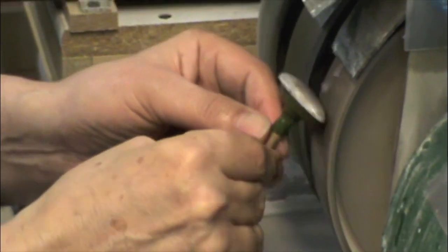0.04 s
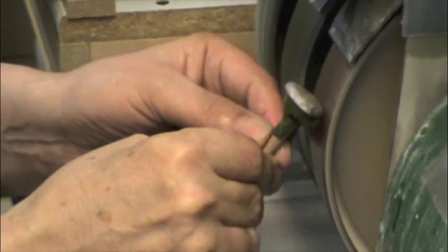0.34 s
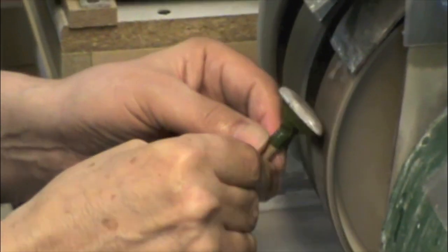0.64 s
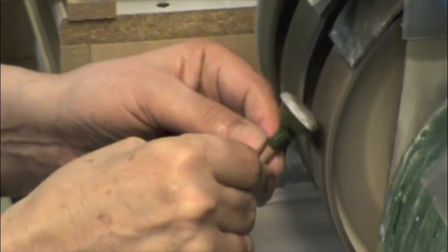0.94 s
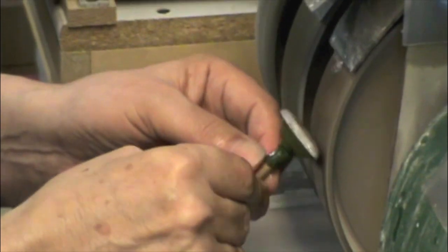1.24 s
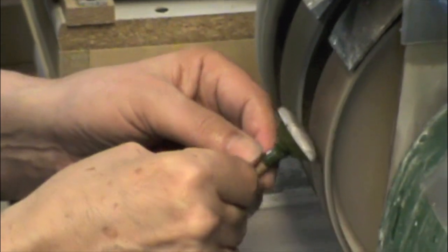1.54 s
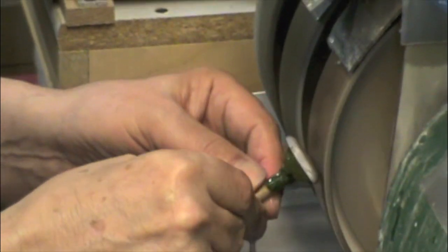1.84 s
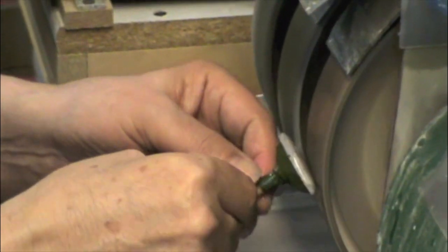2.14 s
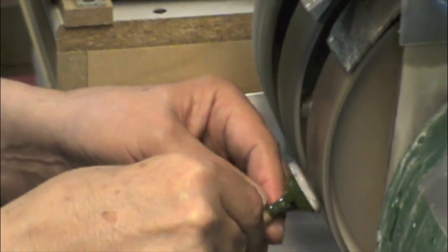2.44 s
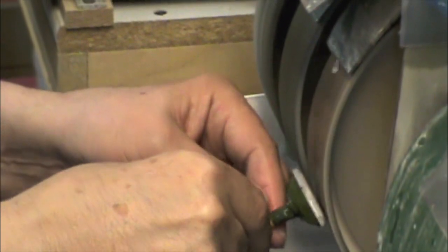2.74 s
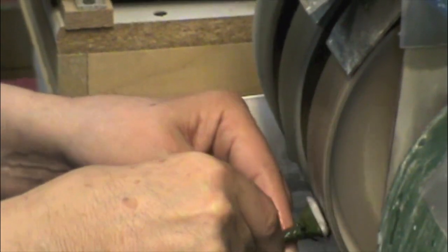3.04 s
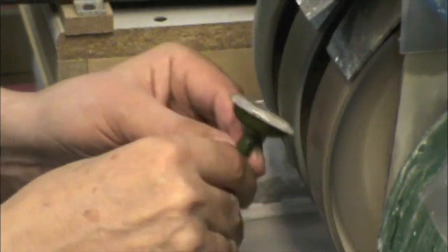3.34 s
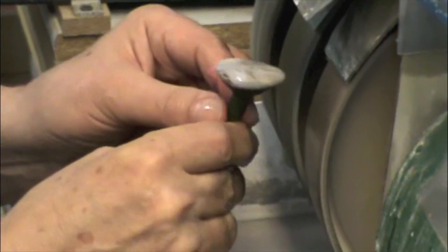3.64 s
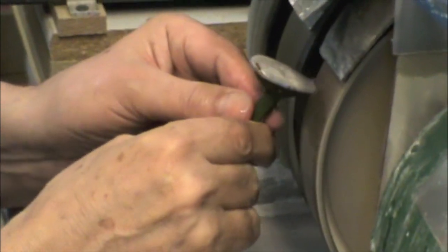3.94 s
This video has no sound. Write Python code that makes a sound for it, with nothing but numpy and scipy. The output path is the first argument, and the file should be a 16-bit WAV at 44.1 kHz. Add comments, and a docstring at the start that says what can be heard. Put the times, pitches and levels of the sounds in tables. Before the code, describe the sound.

Harsh, squealing grinding of a stone against a wheel, lifted off as the machine hums on.

```python
"""Grinding a stone on a wet wheel

A stone fixed to a slim holder is rocked against a grinding wheel and lifted off near the end.
Grit scrapes the stone and makes the holder ring in high tones that swell with each press and die
away after the lift. Underneath, the grinder hums and rumbles, its bearing chirps on every turn
and the wet wheel hisses faintly."""
import sys
import numpy as np
from scipy import signal
from scipy.fft import rfft, irfft
from scipy.io import wavfile
from scipy.ndimage import uniform_filter1d, map_coordinates

SR = 44100
rng = np.random.default_rng(int(sys.argv[2]) if len(sys.argv) > 2 else 0)


def to_wav(s):
    """Save 16-bit WAV."""
    ch = np.atleast_2d(s).T  # columns
    pcm = np.round(np.clip(ch, -1, 1) * 32767)  # PCM
    wavfile.write(sys.argv[1], SR, pcm.astype(np.int16))


N = 176400
TIME_S = np.arange(N) / SR
TURN_HZ = 29.11  # turns of the wheel each second
LIFT_S, LIFT_DB_PER_S = 3.336, 200
STEP = 32  # samples between updates of a ring's loudness

# The holder's modes, the tones it rings at: pitch_hz, offset_db, decay_s (to fall 60 dB), curve_name
HOLDER_MODES = [ (2935,-1.5,.07,"low"),(3095,-20,.03,"press"),(4404,-24,.1,"press"),(4520,-24,.1,"press"),(5135,0,2,"long"),(5346,-27,.4,"press"),
                (5825,-27,.2,"press"),(5997,-28,.2,"press"),(7111,-.5,.33,"pair"),(7381,-8,.35,"pair"),(8122,-18,.4,"press"),(8639,-14,.2,"press"),
                (8701,-10,.2,"press"),(8897,-2,.25,"press"),(9228,-9,.2,"press"),(10492,-19,.3,"press"),(10637,-9,.35,"press"),(10842,-20,.3,"press"),
                (11027,-13,.35,"press"),(11434,-6,.4,"high"),(11580,-4,.25,"high"),(12409,-16,.4,"press"),(12518,-5,.4,"high"),(12726,-11,.3,"press"),
                (12855,-18,.35,"press"),(13270,-7,.2,"high"),(13535,-18,.3,"press"),(14018,-23,.35,"press"),(14250,-13,.4,"high"),(15278,-17,.25,"high")]


def holder():
    """Friction makes the holder ring; it squeals when the stone catches and drives one mode."""
    # Pressure on the wheel, as how hard it drives the modes: time_s, level_db
    pressure = [(0.0, -28), (0.11, -32.5), (0.26, -19.5), (0.42, -26), (0.45, -38), (0.49, -26.5),
                (0.53, -32), (0.55, -22), (0.6, -32), (0.68, -31), (0.73, -36.5), (0.8, -27), (0.83, -29),
                (0.87, -22.5), (0.95, -24.5), (0.98, -19.5), (1.03, -20.5), (1.11, -39), (1.19, -25),
                (1.35, -40), (1.38, -31), (1.64, -25.5), (1.74, -34), (1.87, -26.5), (2.04, -42),
                (2.06, -25), (2.15, -21), (2.23, -30), (2.51, -45), (2.58, -27), (2.71, -22), (2.77, -33.5),
                (2.9, -36.5), (2.97, -27), (3.09, -33), (3.13, -21.5), (3.22, -23), (3.38, -50)]
    # Four curves for rings that come and go with the point of contact: time_s, level_db
    low_ring = [(0,-41.5),(2,-40.5),(2.1,-38),(2.22,-35),(2.5,-45.5),(2.68,-37),(2.95,-40),(3.12,-28),(3.18,-37),(3.3,-60)]
    long_ring = [(0,-46),(.8,-46.5),(1.1,-43),(2.03,-46),(2.15,-35.5),(2.5,-41),(2.7,-40.5),(3.1,-51),(3.2,-41.5),(3.52,-42.5),(4,-64)]
    pair_ring = [(0,-29),(.12,-44),(.2,-38),(.28,-32.5),(.34,-21),(.45,-39.5),(.58,-36),(.75,-47),(.79,-31),(.85,-40),
                 (.91,-27),(.96,-48),(.99,-30),(1.1,-30.5),(1.16,-37),(1.37,-48),(1.43,-32.5),(1.49,-43),
                 (1.63,-27.5),(1.73,-34),(1.85,-33),(2.02,-44),(2.18,-27.5),(2.44,-47),(2.6,-35.5),(2.7,-24.5),(2.91,-41),
                 (3.02,-31.5),(3.11,-41),(3.2,-29),(3.3,-40.5),(3.6,-53)]
    high_ring = [(0.0, -35), (0.14, -41), (0.3, -29), (0.52, -33), (0.95, -38), (1.1, -47), (1.58, -32.5),
                 (1.64, -46), (1.97, -39), (2.1, -29), (2.37, -38), (2.57, -49), (2.7, -31), (2.87, -45),
                 (3.18, -33), (3.3, -37.5)]
    # Brief squeals, each given to the nearest mode: middle_s, half_length_s, pitch_hz, level_db
    squeals = [(0.303,.05,10637,-21.5),(.32,0.055,5997,-35.5),(0.318,.05,11027,-25),(.35,0.051,5346,-37),(0.364,0.087,4404,-34),
               (.48,0.053,11580,-30),(.53,0.085,3095,-38),(0.573,.05,7381,-30),(0.844,.05,3095,-37),(.86,.04,5997,-39),
               (0.925,0.15,4404,-40),(0.99,.1,5346,-38),(1.5,0.07,3095,-34),(1.54,0.09,11600,-31),(1.597,0.093,5346,-38),
               (2.7,0.045,5346,-33),(2.692,0.054,11027,-25),(3.162,0.06,5997,-36),(3.192,.05,10637,-20)]
    lift = lift_db()
    curves = {"press": curve(pressure) + lift, "low": curve(low_ring) + lift,
              "high": curve(high_ring) + lift, "long": curve(long_ring), "pair": curve(pair_ring)}
    contact = undb(lift[::STEP])
    pitches = np.array([mode[0] for mode in HOLDER_MODES])
    boost_db, flicker_db = 1, 2.44
    out = 0
    for hz, offset_db, decay_s, curve_name in HOLDER_MODES:
        push = undb(offset_db + boost_db + curves[curve_name][::STEP])
        for middle_s, half_s, squeal_hz, squeal_db in squeals:
            if pitches[np.argmin(np.abs(pitches - squeal_hz))] == hz:
                push = np.maximum(push, undb(squeal_db) * swell(middle_s, half_s)[::STEP])
        flicker = flicker_db * wander(rate_hz=23.97)[::STEP] * contact
        out = out + ringing_mode(hz, decay_s, 20 * np.log10(push) + flicker)
    return out


def ringing_mode(hz, decay_s, drive_db):
    """One rubbed mode: it swells with its drive and fades no faster than its own decay."""
    friction = resonate(rng.standard_normal(N), hz, width_hz=118)
    ring = resonate(friction, hz, width_hz=.5 * np.log(1000) / np.pi / decay_s)
    fall_db = 60 * TIME_S[::STEP] / decay_s
    held_db = np.maximum.accumulate(drive_db + fall_db) - fall_db
    # Steady rubbing evens out most of the ring's own random swings.
    evenness, window_s = .9, .025
    power = uniform_filter1d(np.abs(ring[::STEP]) ** 2, int(window_s * SR / STEP)) + 1e-6
    gain = undb(held_db) / power ** (evenness / 2)
    return np.sqrt(2) * ring.imag * np.repeat(gain, STEP)[:N]


def scrape():
    """The rasp of grit on stone, coarser where an edge bites."""
    # Loudness of the scrape's two parts: time_s, lower_db, upper_db
    levels = [(0,-41,-27),(.11,-50,-54),(.29,-48,-34),(.45,-42.5,-39),(.56,-45,-33),(.73,-47,-42),(.87,-50,-37),(1.2,-41.5,-35),
              (1.35,-45,-41),(1.6,-42.5,-35.5),(1.85,-39,-33),(2.0,-38,-39.5),(2.26,-43,-36.5),(2.5,-39,-37.5),(2.63,-42,-36),(2.86,-43.5,-35.5),
              (3.0,-43,-34),(3.19,-40.5,-37),(3.3,-56,-52)]
    # Tone colour of each part: pitch_hz, relative_db
    lower_colour = [(500,-25),(1500,-21),(2500,-14),(3050,2),(3600,1.5),(4600,3.5),(5500,4),(6600,1),(8000,-2.5),(10000,-13),(15000,-37)]
    upper_colour = [(4000,-12),(7000,-17.5),(8200,2),(9000,4.5),(9900,-2.5),(11000,4),(12000,-15),(12800,1),(14000,-11),(15600,-18)]
    # Bites of the stone's edge: middle_s, half_length_s, pitch_hz, level_db
    bites = [(1.823,0.15,5140,-35.5),(2.65,0.1,5700,-31),(2.976,0.082,4660,-34)]
    grains = grit()
    lower = colour(grains, lower_colour) * undb(curve(levels, column=1) + 4)
    upper = colour(grains, upper_colour) * undb(curve(levels, column=2) + 3.3)
    out = lower + upper
    for middle_s, half_s, hz, db in bites:
        rasp = resonate(resonate(grit(), hz, width_hz=1300), hz, width_hz=1300).real
        out += np.sqrt(2) * rasp * undb(db) * swell(middle_s, half_s)
    return out * undb(lift_db())


def grit():
    """Tiny hits from uneven grains, stronger and weaker in bunches as the stone chatters."""
    hits_per_s, size_spread_db, chatter_db = 20000, -1.8, 2
    hits = rng.random(N) < hits_per_s / SR
    sizes = rng.standard_normal(N) * undb(size_spread_db * np.minimum(rng.exponential(size=N), 5))
    return unit(hits * sizes * undb(chatter_db * wander(rate_hz=341.4)))


def lift_db():
    """The drop in level as the stone leaves the wheel."""
    return -LIFT_DB_PER_S * np.maximum(TIME_S - LIFT_S, 0)


def last_squeal():
    """Under the lightest touch the lowest mode sings, smooth and pure."""
    # The squeal as the stone slides off: time_s, level_db
    levels = [(3.17,-60),(3.19,-28),(3.29,-31),(3.39,-34.5),(3.44,-66)]
    sounding = (TIME_S > levels[0][0]) & (TIME_S < levels[-1][0])
    tone = np.sqrt(2) * np.sin(2 * np.pi * HOLDER_MODES[0][0] * TIME_S)
    return tone * undb(curve(levels)) * sounding


def bench_spill(sound):
    """Centre a sound and add a little spill from the bench, opposite in left and right."""
    # Strength of the spill: pitch_hz, gain_db
    spill_gain = [(1000,0),(3000,-8.5),(5300,-7),(7100,-16),(9000,-25),(12000,-44)]
    delay_samples = 800
    delay_and_phase = np.exp(2j * np.pi * (np.arange(N // 2 + 1) * delay_samples / N + rng.random()))
    spill = irfft(rfft(sound) * undb(by_frequency(spill_gain)) * delay_and_phase, N)
    return sound + np.outer([1, -1], spill)


def grinder():
    """The running machine, a little to the right and spread wide by the workshop."""
    # How alike its noise is in left and right: pitch_hz, likeness (0 to 1)
    likeness = [(60,.97),(130,0.49),(290,0.87),(640,0.42),(1410,0.76),(3100,0.46),(7000,0.98),(15000,1)]
    # How much louder the left is than the right: pitch_hz, gain_db
    balance = [(60,-2),(200,-2.5),(380,-3),(650,-5.5),(1290,-3),(2380,-3),(4400,-1.5),(8000,0)]
    # How far the left wave runs ahead of the right: pitch_hz, phase_rad
    left_lead = [(30,.25),(70,0.21),(130,0.32),(260,0.67),(860,0.77),(1120,1),(2070,0.52),(4000,0.36),(8000,0.06)]
    speed_hz = TURN_HZ * (1 + 0.001504 * wander(rate_hz=3))
    turns = np.cumsum(speed_hz) / SR
    tones = hum(turns)
    alike = np.sqrt(np.clip(by_frequency(likeness), 0, 1))
    middle = rfft(wheel_noise(turns)) * np.sqrt((1 + alike) / 2) + rfft(tones + bearing(turns))
    side = rfft(wheel_noise(turns)) * np.sqrt((1 - alike) / 2)
    sign = np.array([[1], [-1]])  # left, right
    gain = undb(sign * by_frequency(balance) / 2)
    phase = np.exp(.5j * sign * by_frequency(left_lead))
    return irfft((middle + sign * side) * gain * phase, N)


def hum(turns):
    """The shaft and motor hum in tones that waver in loudness, the lowest ones least."""
    # Tones of the shaft: cycles_per_turn, level_db
    shaft_tones = [(1,-59.5),(2,-60),(3,-52),(4,-51),(5,-41.5),(6,-46),(7,-45),(8,-34.5),(9,-36.5),(12,-53.5),(13,-46.5)]
    # Steady tones of the motor: pitch_hz, level_db
    motor_tones = [(106,-56),(120,-43.5),(212,-43.5),(320,-42.5),(841,-52.5)]
    tones = [(per_turn * TURN_HZ, per_turn * turns, db) for per_turn, db in shaft_tones]
    tones += [(hz, hz * TIME_S, db) for hz, db in motor_tones]
    out = 0
    for hz, cycles, db in tones:
        waver_db = 1.5 * min(hz / 228, 1) * wander(rate_hz=9)
        out = out + np.sqrt(2) * undb(db + waver_db) * np.sin(2 * np.pi * (cycles + rng.random()))
    return out


def bearing(turns):
    """The bearing chirps at the same places in every turn, never quite alike in strength or pitch."""
    # Chirps in one turn: place_in_turn (0 to 1), half_length_s, pitch_hz, level_db
    chirps = [(0.74,.005,2170,-36.5),(.47,.006,2280,-39.5),(0.32,0.0067,4300,-45.5)]
    waver_hz, scatter_db = 33.88, 2
    out = 0
    for place, half_s, hz, db in chirps:
        from_peak_s = ((turns - place + .5) % 1 - .5) / TURN_HZ
        pitch_hz = hz + waver_hz * wander(1 / half_s)
        tone = np.sqrt(2) * np.sin(2 * np.pi * np.cumsum(pitch_hz) / SR)
        pulses = np.exp(-(from_peak_s / half_s) ** 2)
        out = out + tone * pulses * undb(db + scatter_db * wander(TURN_HZ))
    return out


def wheel_noise(turns):
    """The rough wheel rumbles, partly repeating on every turn, and its wet rim hisses."""
    # Tone colour of the rumble and of the hiss: pitch_hz, relative_db
    rumble_colour = [(25,-38),(42,-45),(60,-39),(90,-26),(125,-7),(185,-5),(225,1),(300,2),(400,-1.5),(500,-5),(600,-3.5),(750,-9.5),(1050,-10),(1300,-13.5),(1700,-15.5),(2400,-14.5),(3000,-13),(3600,-23),(6000,-23.5),(14000,-71)]
    hiss_colour = [(3000,3),(6000,-9),(9000,4),(11500,-2),(14000,-14)]
    rumble_db, repeat_share, hiss_db, flicker_db = -28, 0.12, -41.5, 3
    bumps = rng.standard_normal(1514)  # once around the rim
    repeating = unit(map_coordinates(bumps, [turns % 1 * len(bumps)], order=1, mode="grid-wrap"))
    roughness = np.sqrt(repeat_share) * repeating + np.sqrt(1 - repeat_share) * rng.standard_normal(N)
    rumble = colour(roughness, rumble_colour) * undb(rumble_db)
    hiss = colour(rng.standard_normal(N), hiss_colour)
    return rumble + hiss * undb(hiss_db + flicker_db * wander(rate_hz=60))


def undb(db):
    """Turn decibels into a gain to multiply by."""
    return 10 ** (np.asarray(db) / 20)


def unit(sound):
    """Scale a sound to an average power of 1."""
    return sound / np.sqrt(np.mean(np.abs(sound) ** 2))


def curve(rows, column=1):
    """Join the points of a time table, giving a value for every sample."""
    rows = np.array(rows, float)
    return np.interp(TIME_S, rows[:, 0], rows[:, column])


def by_frequency(rows):
    """Join the points of a pitch table, giving a value for every frequency."""
    rows = np.array(rows, float)
    hz = np.arange(N // 2 + 1) * SR / N
    return np.interp(np.log(hz + 1), np.log(rows[:, 0]), rows[:, 1])


def colour(sound, rows):
    """Shape a sound's lows and highs by a table, at power 1."""
    return unit(irfft(rfft(sound) * undb(by_frequency(rows)), N))


def swell(middle_s, half_s):
    """A smooth rise to 1 and back."""
    return np.exp(-((TIME_S - middle_s) / half_s) ** 2)


def wander(rate_hz):
    """A smooth random drift, about 1 in size."""
    size = max(int(SR / rate_hz), 1)
    steps = np.repeat(rng.standard_normal(N // size + 1), size)[:N]
    return unit(uniform_filter1d(steps, size))


def resonate(sound, hz, width_hz):
    """Make a sound ring around one pitch; gives complex numbers, at power 1."""
    return unit(signal.lfilter([1], [1, -np.exp((2j * hz - width_hz) * np.pi / SR)], sound))


def scene():
    """The scraping stone and ringing holder over the running grinder."""
    return bench_spill(scrape() + holder() + last_squeal()) + grinder()


def record(dry):
    """The recorder cuts off the highest treble."""
    top_hz = 15650
    return signal.sosfilt(signal.ellip(10, .1, 80, top_hz, fs=SR, output="sos"), dry)


dry = scene()
out = record(dry)
to_wav(out)
```